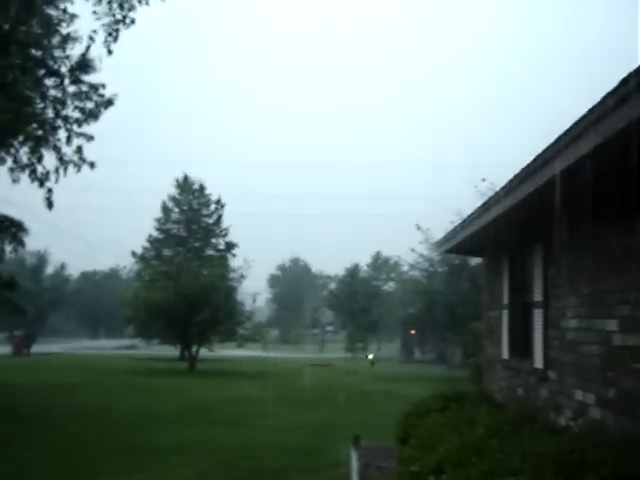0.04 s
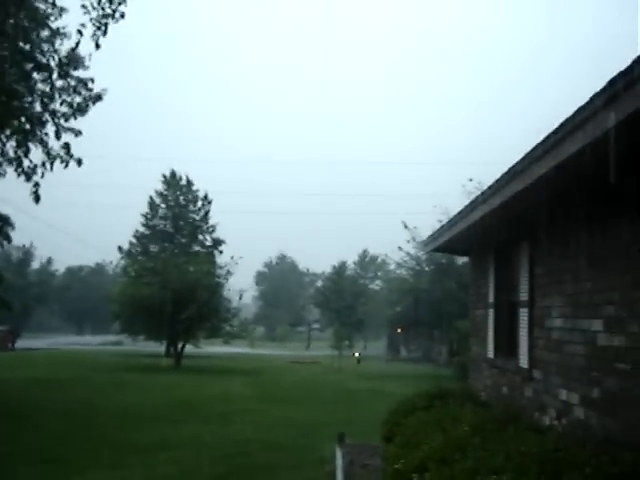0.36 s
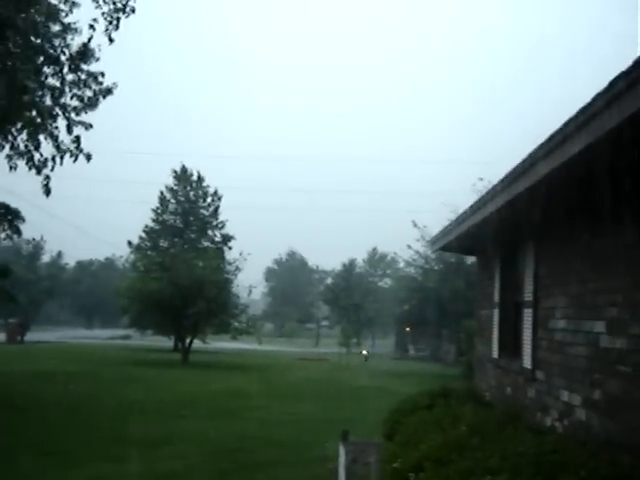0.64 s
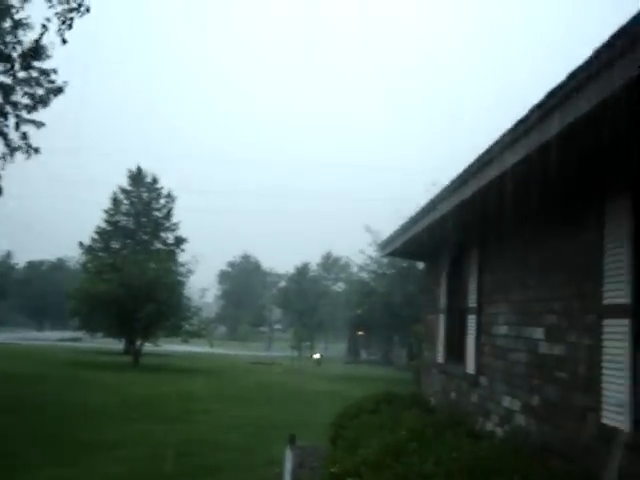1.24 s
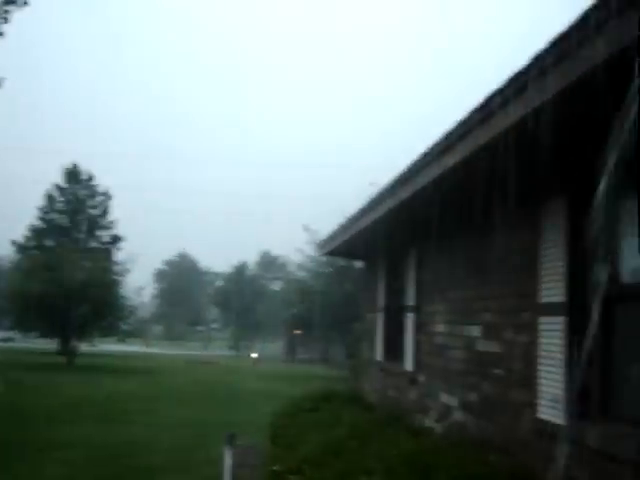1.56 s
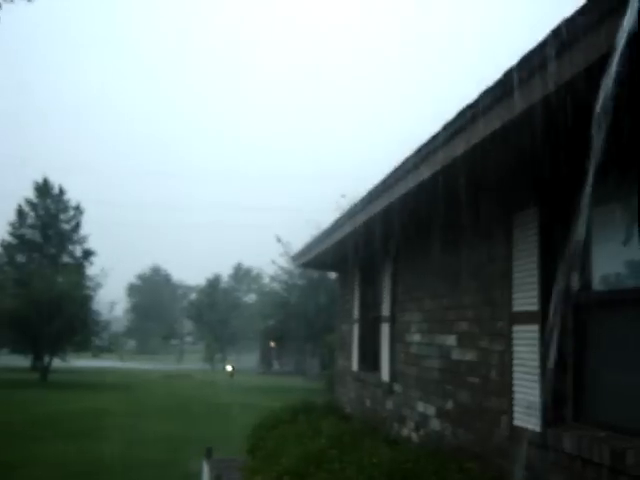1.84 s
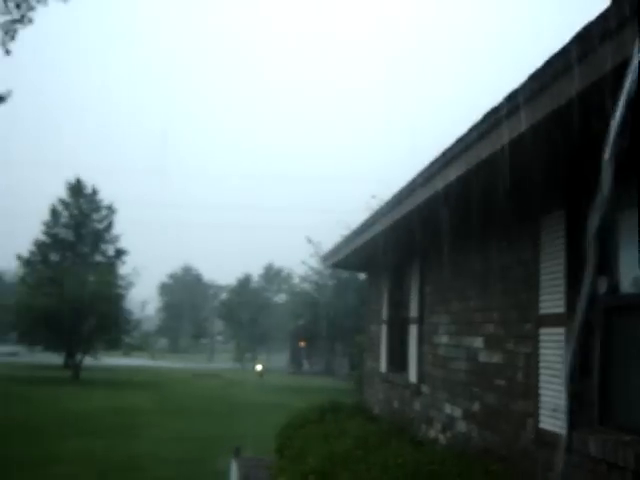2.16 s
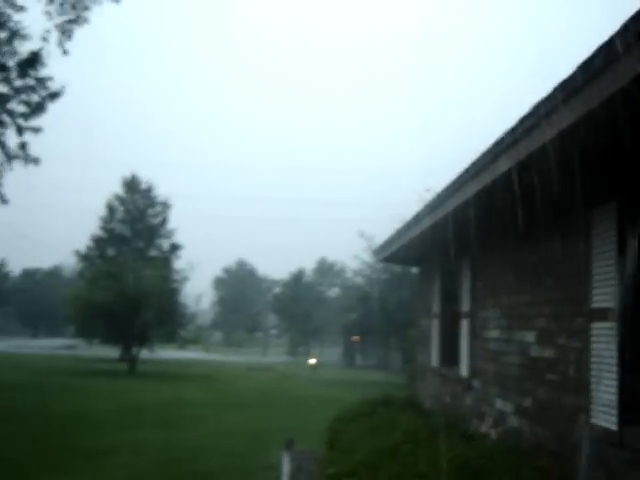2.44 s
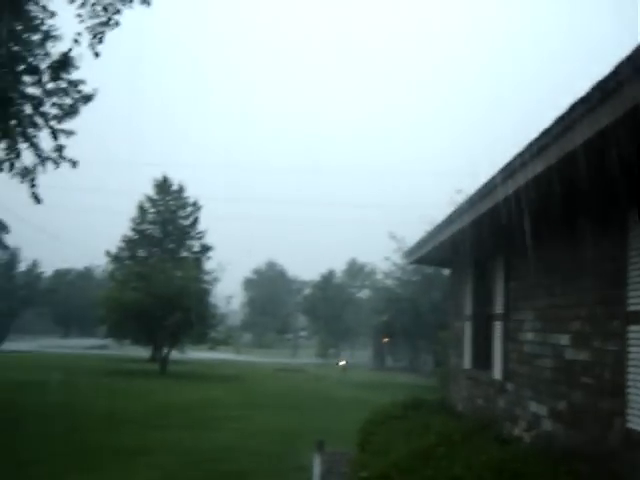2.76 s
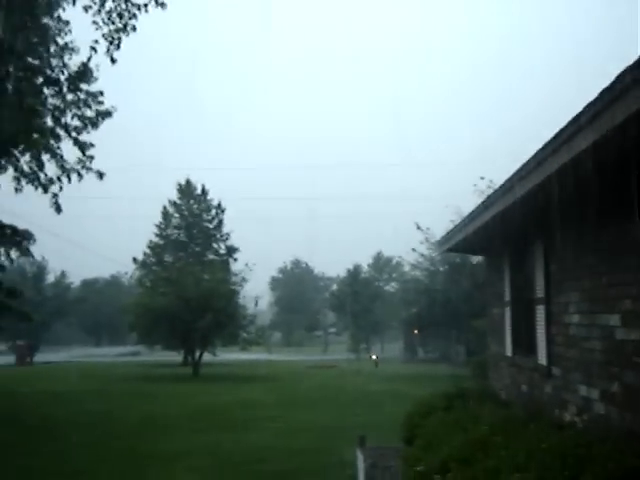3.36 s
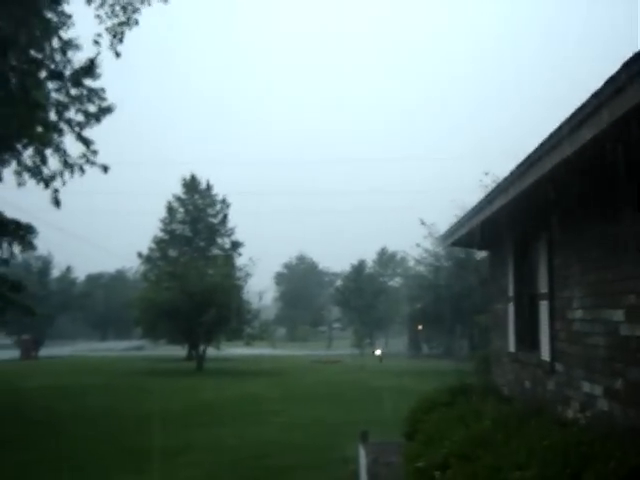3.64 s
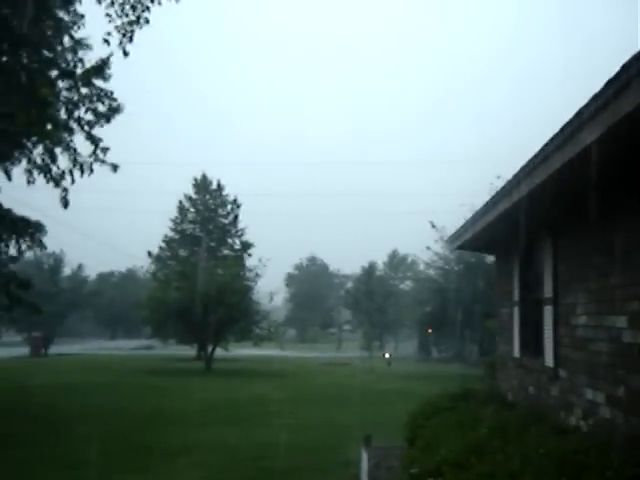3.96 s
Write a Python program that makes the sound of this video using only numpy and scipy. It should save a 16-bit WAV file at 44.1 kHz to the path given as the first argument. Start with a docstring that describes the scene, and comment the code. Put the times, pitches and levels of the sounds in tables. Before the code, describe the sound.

A steady downpour hisses and patters outside a house. Close to the microphone, sheltered by the roof overhang, water spills off the edge the whole time, landing in ragged splats, dull thuds and small gurgling puddle plops.

```python
"""Under the eaves of a brick house, by a lawn in heavy rain; mono.
Far rain hisses, the downpour rumbles, near drops patter and faintly ring something hollow.
Runoff from the roof edge hits wet ground in ragged splats and dull thuds, throws up a fine mist
and rings bubbles in a puddle. The wall repeats splats, thuds and bubbles a few milliseconds later,
and the overhang gives them a short tail."""
import sys
import numpy as np
from scipy import signal
from scipy.fft import rfft, irfft, next_fast_len
from scipy.io import wavfile
from scipy.ndimage import uniform_filter1d, map_coordinates

SR = 44100
rng = np.random.default_rng(int(sys.argv[2]) if len(sys.argv) > 2 else 0)


def output_pcm(signal):
    """Save a mono or channel-first signal as 16-bit PCM at the path in sys.argv[1].

    Samples are clipped to [-1, 1] before scaling.
    """
    pcm = np.clip(np.atleast_2d(signal).T, -1, 1) * 32767
    wavfile.write(sys.argv[1], SR, np.round(pcm).astype(np.int16))


N = 176400
DROPLETS_PER_S = 12000


def amp(db):
    """Decibels to gain."""
    return 10 ** (np.asarray(db) / 20)


def unit(x):
    """Scale to rms 1."""
    return x / np.sqrt(np.mean(x ** 2) + 1e-20)


def colour(points, hz):
    """Gain of (Hz, dB) points on a log axis."""
    f, db = np.transpose(points)
    return amp(np.interp(np.log(hz + 1), np.log(f + 1), db))


def bell(hz, centre_hz, octaves):
    """Bell curve on a log axis, 1 at its centre."""
    return np.exp(-.5 * (np.log2((hz + 1) / centre_hz) / octaves) ** 2)


def filtered(x, response):
    """Filter x by response(hz)."""
    size = next_fast_len(len(x) + 2048)
    return irfft(rfft(x, size) * response(np.fft.rfftfreq(size, 1 / SR)), size)[:len(x)]


def curve(points):
    """One value per sample from (s, value) points."""
    s, value = np.transpose(points)
    return np.interp(np.arange(N) / SR, s, value)


def wobble(knots_per_s):
    """Smooth random curve."""
    knots = rng.standard_normal(int(N * knots_per_s / SR) + 4)
    return map_coordinates(knots, [np.arange(N) * knots_per_s / SR])


def add(track, start_s, sound):
    """Mix a sound into a track."""
    i = int(np.clip(start_s * SR, 0, N - 1))
    track[i:i + len(sound)] += sound[:N - i]


def random_events(per_s, traits):
    """Each row: start in seconds, then one normal draw within +-2 per trait."""
    n = int(per_s * N / SR)
    return np.column_stack([rng.uniform(0, N / SR, n), np.clip(rng.standard_normal((n, traits)), -2, 2)])


def impacts(per_s, spread_db, size=N):
    """Random impulses of uneven strength."""
    hits = rng.random(size) < per_s / SR
    signs = np.sign(rng.standard_normal(size))
    return hits * signs * amp(spread_db * np.clip(rng.standard_normal(size), -2, 2))


def with_wall(sound, scatter_s=.0004, delay_s=.00385, echo_gain=.7):
    """Sound plus its echo off the brick wall; the delay depends on where the water lands."""
    gap = int(np.clip(delay_s + scatter_s * rng.standard_normal(), delay_s / 2, 2 * delay_s) * SR)
    return np.pad(sound, (0, gap)) + echo_gain * np.pad(sound, (gap, 0))


def with_eaves(sound, t60_s=.15, tail_db=-12, predelay_s=.00385):
    """Sound plus the short tail that lingers under the overhang."""
    t = np.arange(SR // 4) / SR
    tail = rng.standard_normal(len(t)) * amp(-60 * t / t60_s) * (t > predelay_s)
    return sound + amp(tail_db) * signal.fftconvolve(sound, tail / np.linalg.norm(tail))[:N]


def flow_gain(splash_db_per_flow_db=1.7):
    """Gain of the splashing as the runoff swells and thins, rms 1."""
    # Each row: time in seconds, relative flow in dB.
    flow_db = [(0, -28.5), (0.06, -29.5), (.11, -27), (.165, -32.5), (0.2, -26.5), (.33, -28), (0.5, -27.5),
               (0.89, -27.5), (1.1, -26.5), (1.2, -28.5), (1.38, -27), (1.47, -31.5), (1.56, -27),
               (1.72, -28.5), (1.87, -27), (2.28, -28), (2.37, -32), (2.44, -26.5), (2.59, -28),
               (2.66, -26.5), (3.0, -27.5), (3.33, -26.5), (3.39, -29.5), (3.46, -28), (3.7, -28.5),
               (3.85, -27.5), (4, -28)]
    return unit(amp(splash_db_per_flow_db * curve(flow_db)))


def far_rain(level_db=-25.5, patchy_db=1.3, swell_db=.4):
    """Countless far drops merge into a slightly patchy hiss."""
    # Each row: frequency in Hz, relative density in dB.
    spectrum = [(100, -36), (250, -3.5), (400, -5.5), (750, -2.5), (1400, -4), (2500, -2.5), (5000, -4),
                (7000, -5.5), (10000, -8.5)]
    noise_stft = signal.stft(rng.standard_normal(N), nperseg=512)[2]
    patches = uniform_filter1d(rng.standard_normal(noise_stft.shape), size=10, axis=0)
    patches = unit(uniform_filter1d(patches, size=10, axis=1))
    hiss = signal.istft(noise_stft * amp(patchy_db * patches), nperseg=512)[1][:N]
    gain = amp(level_db + swell_db * wobble(knots_per_s=6.2))
    return gain * unit(filtered(hiss, lambda hz: colour(spectrum, hz)))


def rumble():
    """The downpour drums dully on roof and ground."""
    # Each row: frequency in Hz, relative density in dB.
    spectrum = [(20, -24.5), (42, -18.5), (65, -6), (82, -2), (105, -11), (152, 1), (195, -4.5),
                (290, -3.5), (400, -10.5), (900, -26)]
    # Each row: time in seconds, level in dB.
    level_db = [(0, -35.5), (.3, -36), (.6, -39.5), (1.25, -34.5), (1.5, -43.5), (1.8, -40.5), (2.3, -45),
                (2.7, -40), (2.95, -41), (3.2, -38), (3.4, -42.5), (3.7, -38.5), (4, -43.5)]
    return amp(curve(level_db)) * unit(filtered(rng.standard_normal(N), lambda hz: colour(spectrum, hz)))


def hollow_ring(level_db=-37.5):
    """Drops excite the modes of something hollow nearby."""
    # Each row: frequency in Hz, bandwidth in Hz, relative gain in dB.
    modes = [(138.7, 39, -8.5), (547, 20, -6.5), (730.7, 10.3, 0), (832, 20, -3), (952.4, 14, 1),
             (1017, 18, -4.5), (2344, 95, -10.5)]

    def body(hz):
        return sum(amp(db) * 1j * hz * width_hz / (mode_hz ** 2 - hz ** 2 + 1j * hz * width_hz)
                   for mode_hz, width_hz, db in modes)
    return amp(level_db) * unit(filtered(impacts(per_s=300, spread_db=2), body))


def patter(per_s, level_db):
    """Near raindrops land as bright clicks."""
    # Each row: frequency in Hz, relative density in dB.
    spectrum = [(100, -20), (400, -13), (1000, 3), (2500, 9), (5000, 11), (10000, 5)]
    drops = impacts(per_s, spread_db=3.2)
    return amp(level_db) * unit(filtered(drops, lambda hz: colour(spectrum, hz)))


def ticks(pitch_hz=4800, decay_s=.00015):
    """Single drops hit very close, each a sharply damped ring."""
    # Each row: start in seconds, gain in dB.
    drops = [(0.3593, -2.5), (1.435, -4), (3.148, 0), (3.278, -5), (3.298, -2.5), (3.416, -15),
             (3.744, -14)]
    t = np.arange(SR // 200) / SR
    tick = np.exp(-t / decay_s) * np.sin(2 * np.pi * pitch_hz * t)
    track = np.zeros(N)
    for start_s, db in drops:
        add(track, start_s, amp(db) * tick)
    return track


def mist(level_db=-33.6, flicker_db=6):
    """Fine spray thrown up by the splashes sizzles in quick, uneven puffs."""
    # Each row: frequency in Hz, relative density in dB.
    spectrum = [(2500, -25), (5000, -10), (7500, -1.5), (10000, 0)]
    puffs = amp(flicker_db * np.clip(wobble(knots_per_s=70), -2, 1))
    sizzle = filtered(impacts(DROPLETS_PER_S, spread_db=10.5), lambda hz: colour(spectrum, hz))
    return amp(level_db) * unit(puffs * sizzle) * flow_gain()


def bubble(hz, decay_cycles, onset_cycles=.9, rise_per_decay=.03, shake_rad=.78, shake_cycles=2.25):
    """Trapped air rings briefly and rises in pitch; churning water shakes its phase."""
    cycles = np.arange(int(6 * decay_cycles / hz * SR)) * hz / SR
    envelope = (1 - np.exp(-cycles / onset_cycles)) * np.exp(-cycles / decay_cycles)
    shake = np.interp(cycles / shake_cycles, np.arange(64), rng.standard_normal(64))
    phase = 2 * np.pi * cycles * (1 + rise_per_decay * (cycles / decay_cycles / 2 - 1))
    return envelope / envelope.max() * np.sin(phase + shake_rad * shake)


def puddle(spread_db=4):
    """Loud plops and plinks under the stream, over a gurgle of small bubbles."""
    # Each row: start in seconds, pitch in Hz, level in dB, decay in cycles.
    loud_bubbles = [(.010, 1160, -13, 1.2), (0.028, 1155, -14.5, 4.8), (.052, 633, -21, 4),
                    (0.207, 980, -21.5, 5.6), (.366, 533, -25.5, 3), (.388, 710, -24, 3.1),
                    (.622, 693, -23.5, 7.9), (0.831, 457, -28, 2.3), (.965, 531, -16, 2),
                    (1.151, 2650, -8, 1.25), (1.229, 684, -21.5, 4.3), (1.35, 677, -22, 5),
                    (2.176, 580, -27, 3.7), (2.543, 1214, -19, 5.2), (2.654, 704, -26, 4.8),
                    (3.023, 566, -28, 2.6), (3.129, 2440, -17, 6.4), (3.1705, 2180, -10.5, 3.2),
                    (3.193, 530, -19.5, 1.1), (3.805, 480, -27.5, 4)]
    # Each row: bubbles per second, middle pitch in Hz, spread in octaves, decay in cycles, level in dB.
    swarms = [(199.65, 299, 0.517, 2.5, -47), (150.2, 720, 0.501, 4.7, -38.5), (160, 2495, 0.546, 2.8, -34)]
    track = np.zeros(N)
    for start_s, hz, db, decay_cycles in loud_bubbles:
        add(track, start_s, amp(db) * with_wall(bubble(hz, decay_cycles), scatter_s=0))
    for per_s, hz, octaves, decay_cycles, db in swarms:
        swarm = np.zeros(N)
        for start_s, pitch, strength in random_events(per_s, traits=2):
            ring = bubble(hz * 2 ** (octaves * pitch), decay_cycles)
            add(swarm, start_s, amp(spread_db * strength) * with_wall(ring))
        track += amp(db) * unit(swarm)
    return track


def spatter(per_s, response, rise_s, decay_s):
    """Short burst of tiny impacts coloured by response(hz); rms about 1 at its crest."""
    t = np.arange(SR // 10) / SR
    spray = unit(filtered(impacts(per_s, spread_db=2, size=len(t)), response))
    envelope = (1 - np.exp(-t / rise_s)) * np.exp(-(t / decay_s) ** 2)
    return unit(spray * envelope) * np.sqrt(np.mean(envelope ** 2)) / envelope.max()


def thuds(impacts_per_s=1500, width_octaves=.56, rise_s=.003):
    """Thick lumps of runoff land on soaked ground, dull and unpitched."""
    # Each row: start in seconds, level in dB, decay in seconds, band centre in Hz.
    lumps = [(.04, -34.5, 0.029, 320), (.768, -32.5, 0.029, 310), (.815, -29, .03, 378),
             (1.112, -30.5, 0.014, 330), (1.234, -28, .028, 460), (1.325, -29.5, .045, 470),
             (1.765, -30.5, 0.034, 318), (1.995, -33.5, .012, 340), (2.17, -30, 0.017, 400),
             (2.63, -32, 0.025, 320), (2.69, -36, 0.021, 330), (3.02, -32.5, 0.044, 415),
             (3.193, -29.5, 0.032, 340), (3.464, -32, .02, 330), (3.712, -32, 0.022, 290),
             (3.805, -33, .03, 420)]
    track = np.zeros(N)
    for start_s, db, decay_s, centre_hz in lumps:
        thud = spatter(impacts_per_s, lambda hz: bell(hz, centre_hz, width_octaves), rise_s, decay_s)
        add(track, start_s, amp(db) * with_wall(thud, scatter_s=0))
    return track


def splat(decay_s, hump_hz, hump_db=12.5, hump_octaves=.69, rise_s=.0015):
    """A lump of water bursts into droplets: a broad spray with one spectral hump."""
    # Each row: frequency in Hz, relative density in dB.
    spectrum = [(100, -30), (300, -10.5), (700, -5), (1400, -7), (2600, -6), (4500, -8.5), (7000, -5),
                (10000, -5)]

    def response(hz):
        return colour(spectrum, hz) * amp(hump_db * bell(hz, hump_hz, hump_octaves))
    return spatter(DROPLETS_PER_S, response, rise_s, decay_s)


def runoff(small_db=-30.5, small_decay_s=.0035, small_hz=2970, spread_octaves=.97, spread_db=2.1):
    """Roof water slaps wet ground: big splats over a ragged run of small ones."""
    # Each row: start in seconds, level in dB, decay in seconds, hump centre in Hz.
    big_splats = [(.008, -19.5, 0.01, 1600), (.096, -23.5, .022, 3880), (.188, -20, 0.0076, 5460),
                  (0.211, -26.5, 0.034, 3600), (.284, -23, 0.017, 4200), (.361, -17.5, 0.015, 2580),
                  (.472, -21, 0.014, 3280), (.5, -25.5, 0.029, 4500), (0.621, -20.5, 0.0064, 2420),
                  (.768, -24.5, 0.017, 2200), (.812, -23, 0.013, 5040), (.84, -24, 0.0061, 3500),
                  (1.049, -25, .022, 1400), (1.151, -24, 0.0057, 3500), (1.27, -23.5, 0.02, 2540),
                  (1.366, -21.5, 0.013, 3370), (1.387, -23, 0.0071, 3350), (1.431, -23, .012, 3500),
                  (1.531, -22.5, 0.016, 3470), (1.831, -17.5, 0.0086, 4700), (1.845, -25.5, .011, 1900),
                  (2.017, -23.5, 0.018, 3500), (2.046, -18.5, .0057, 5530), (2.082, -26.5, 0.0082, 2800),
                  (2.276, -24, 0.022, 1550), (2.476, -25.5, 0.0099, 4230), (2.495, -20, .013, 3240),
                  (2.621, -23, 0.015, 6000), (2.791, -21.5, .03, 3630), (2.838, -23, 0.0068, 4000),
                  (2.878, -23.5, 0.014, 4000), (2.924, -23.5, .01, 3500), (2.996, -21, 0.019, 6270),
                  (3.04, -19.5, 0.0078, 3400), (3.065, -20, 0.024, 3160), (3.172, -23, 0.019, 2110),
                  (3.274, -23, 0.014, 3700), (3.316, -22.5, .028, 2180), (3.412, -19.5, .0036, 5000),
                  (3.441, -21, .022, 4240), (3.492, -18.5, 0.0053, 3280), (3.519, -20, 0.0061, 3030),
                  (3.62, -22.5, .022, 5100), (3.738, -19, 0.0082, 3750)]
    big, small = np.zeros(N), np.zeros(N)
    for start_s, db, decay_s, hump_hz in big_splats:
        add(big, start_s, amp(db) * with_wall(splat(decay_s, hump_hz)))
    for start_s, strength, length, pitch in random_events(per_s=130, traits=3):
        burst = splat(small_decay_s * 2 ** (length / 2), small_hz * 2 ** (spread_octaves * pitch))
        add(small, start_s, amp(spread_db * strength) * with_wall(burst))
    return big + amp(small_db) * unit(small) * flow_gain()


def scene():
    """Rain all around and water falling by the wall, the same in both channels."""
    background = far_rain() + rumble()
    dense_drops = patter(per_s=6000, level_db=-28.5) * flow_gain()
    close_drops = patter(per_s=45, level_db=-42) + ticks()
    rain = background + dense_drops + close_drops + hollow_ring()
    mono = rain + mist() + with_eaves(runoff() + thuds() + puddle())
    return np.array([mono, mono])


def record(dry):
    """Brick-wall low-pass on each channel."""
    cutoff_hz = 10050
    return np.array([filtered(channel, lambda hz: hz < cutoff_hz) for channel in dry])


dry = scene()
out = record(dry)
output_pcm(out)
```